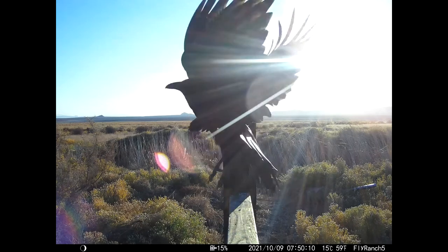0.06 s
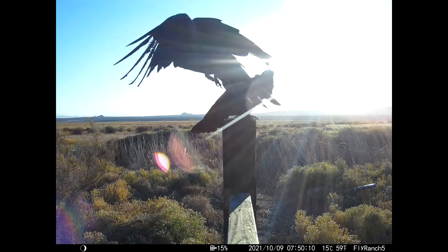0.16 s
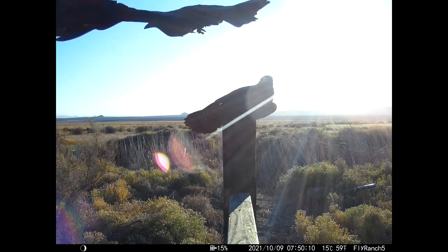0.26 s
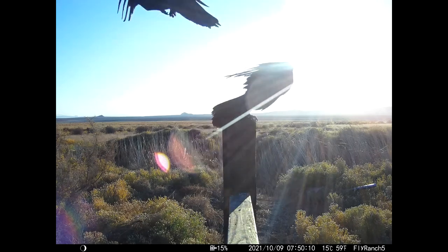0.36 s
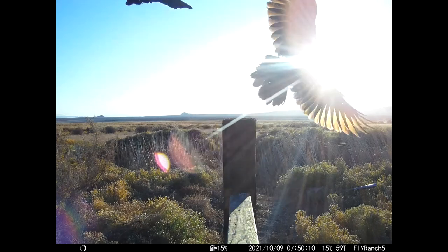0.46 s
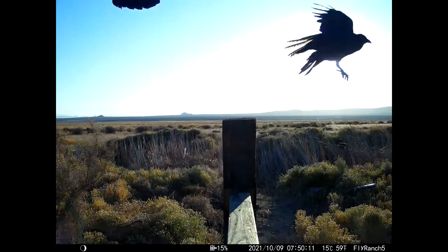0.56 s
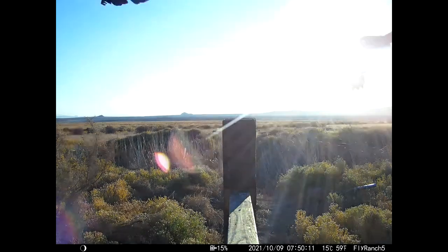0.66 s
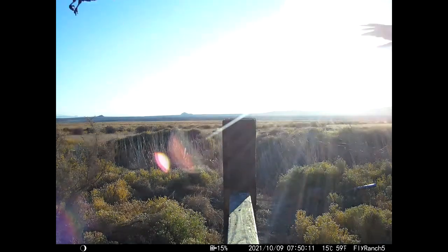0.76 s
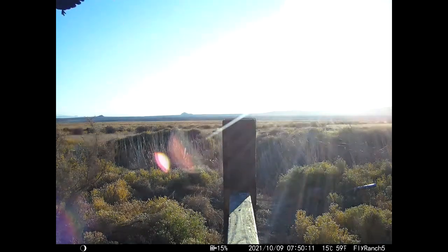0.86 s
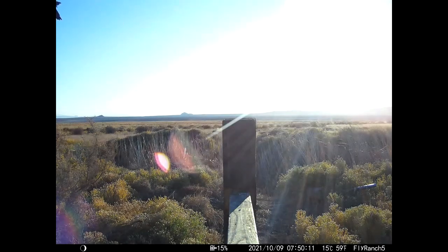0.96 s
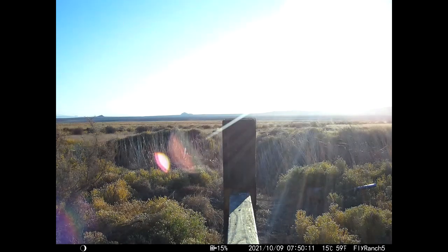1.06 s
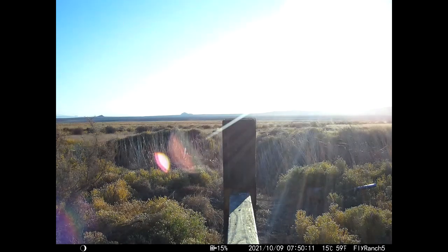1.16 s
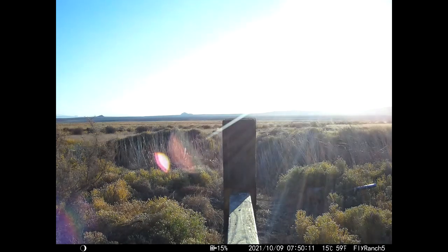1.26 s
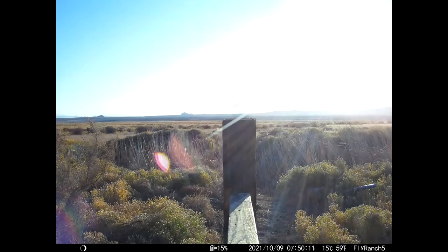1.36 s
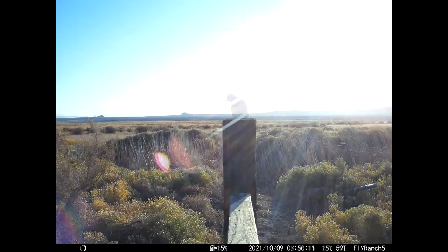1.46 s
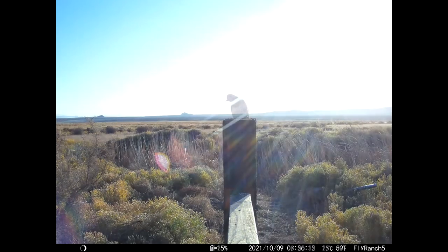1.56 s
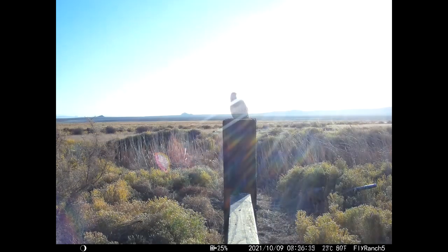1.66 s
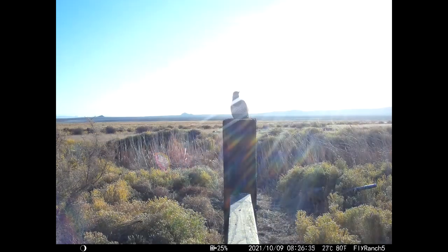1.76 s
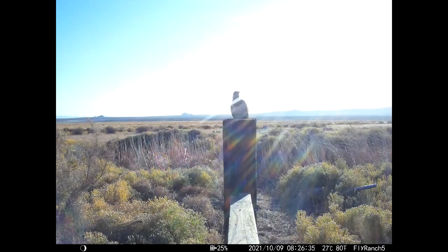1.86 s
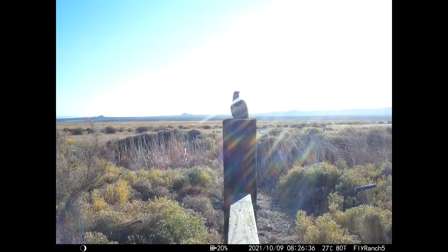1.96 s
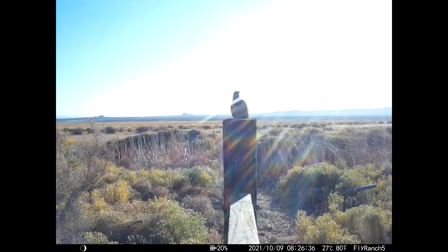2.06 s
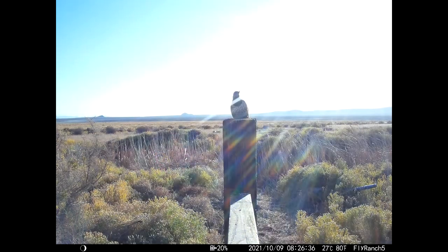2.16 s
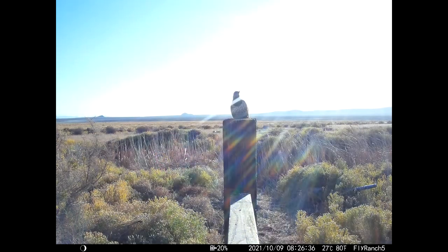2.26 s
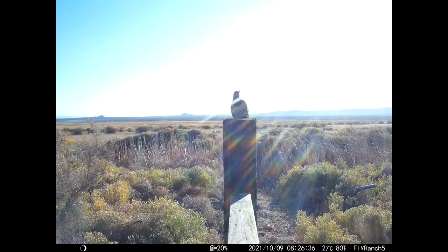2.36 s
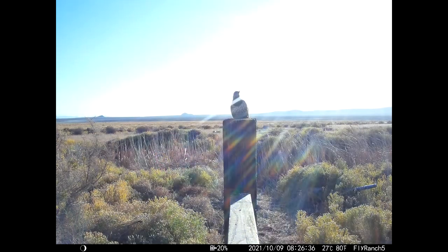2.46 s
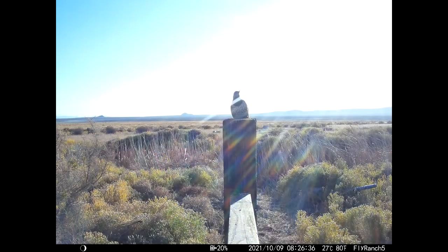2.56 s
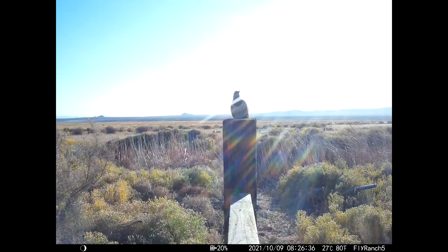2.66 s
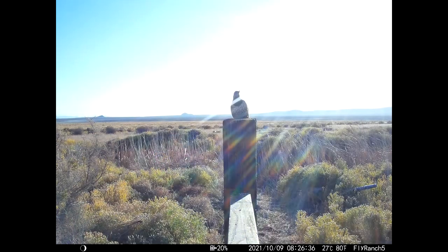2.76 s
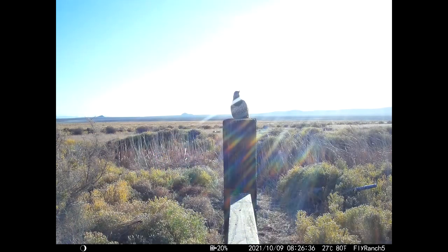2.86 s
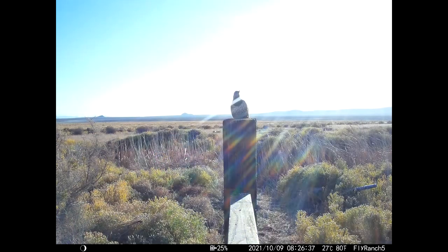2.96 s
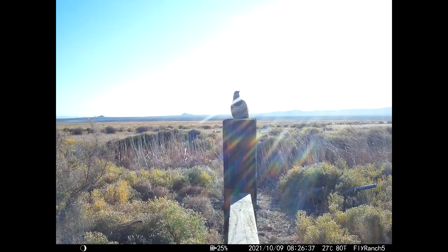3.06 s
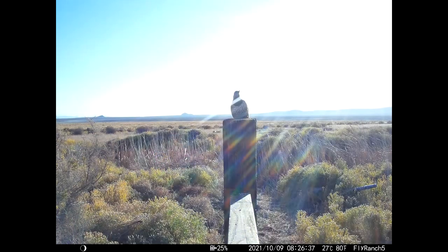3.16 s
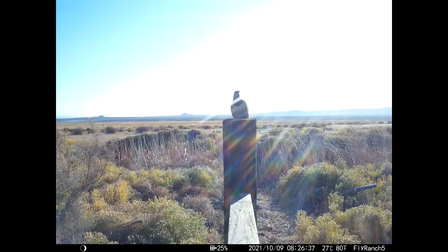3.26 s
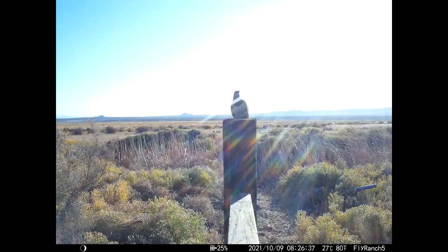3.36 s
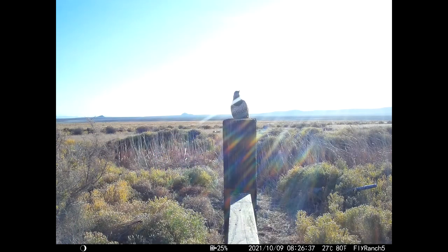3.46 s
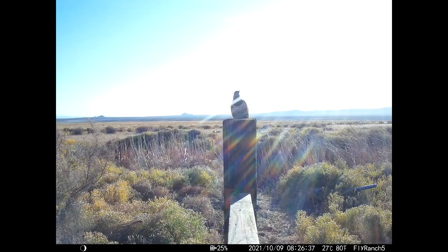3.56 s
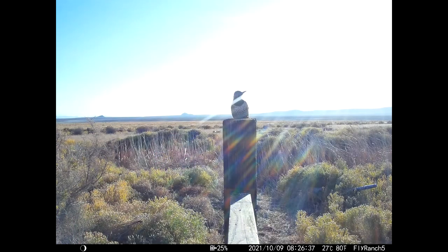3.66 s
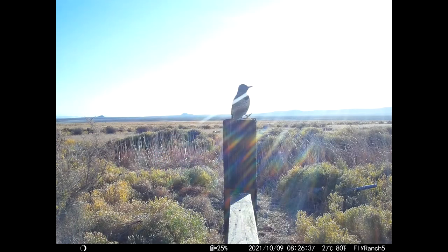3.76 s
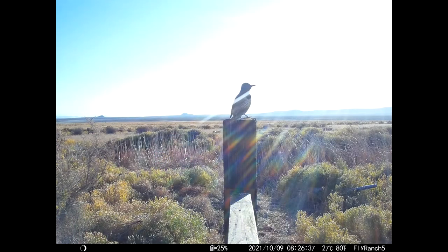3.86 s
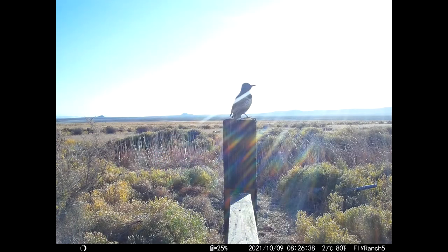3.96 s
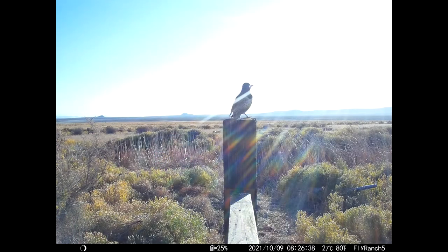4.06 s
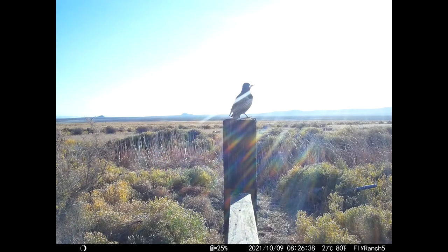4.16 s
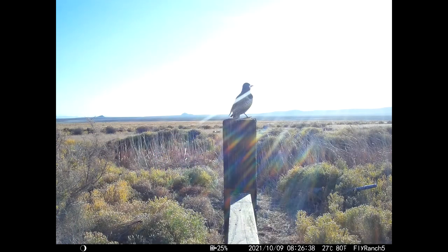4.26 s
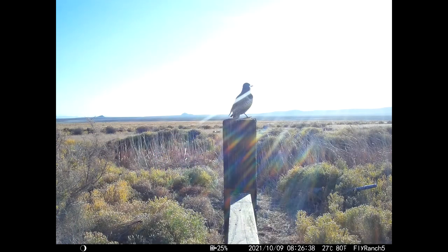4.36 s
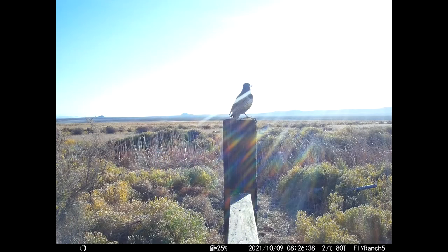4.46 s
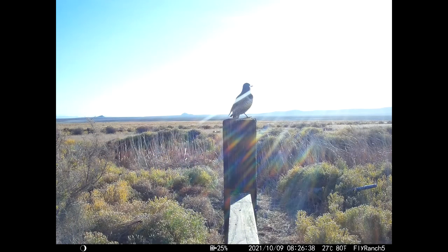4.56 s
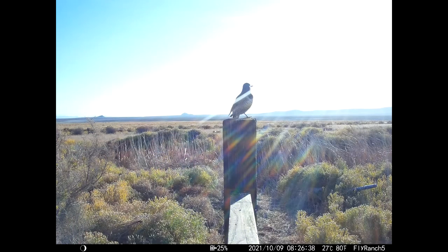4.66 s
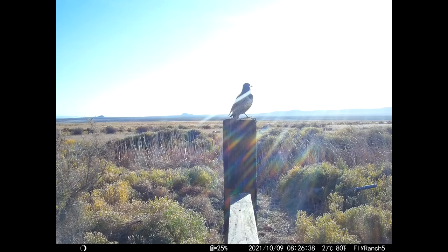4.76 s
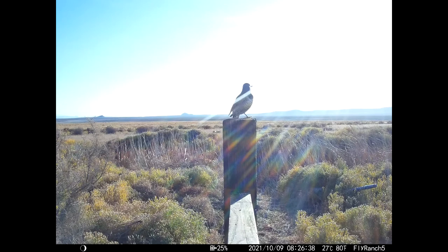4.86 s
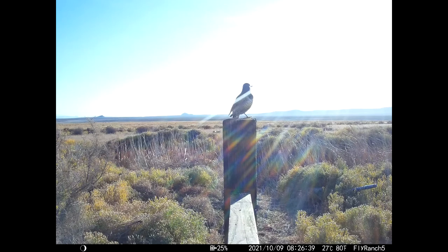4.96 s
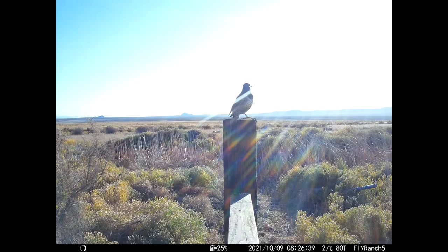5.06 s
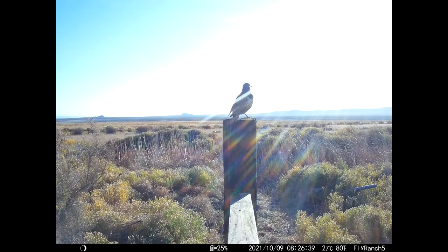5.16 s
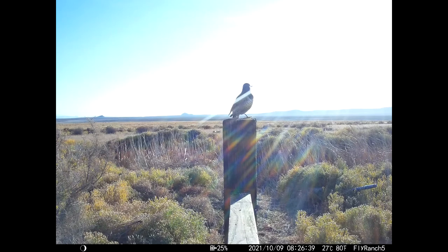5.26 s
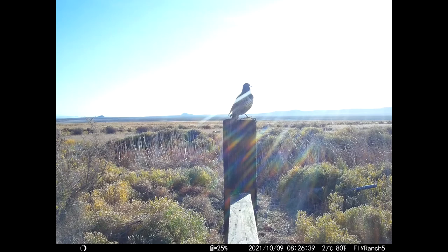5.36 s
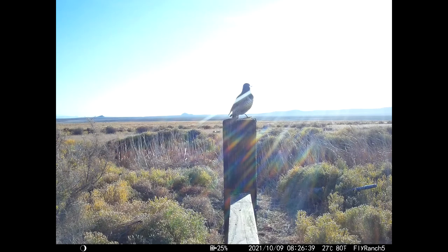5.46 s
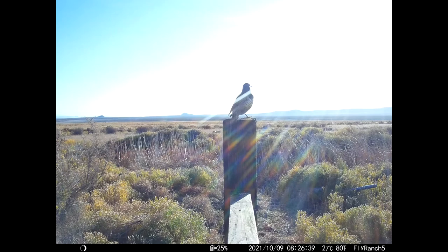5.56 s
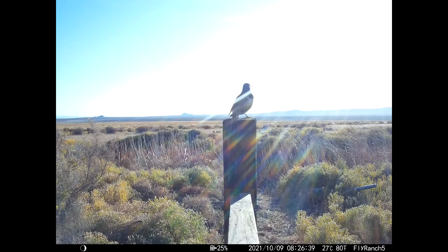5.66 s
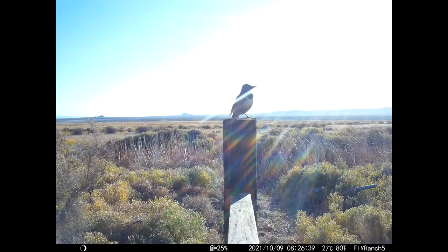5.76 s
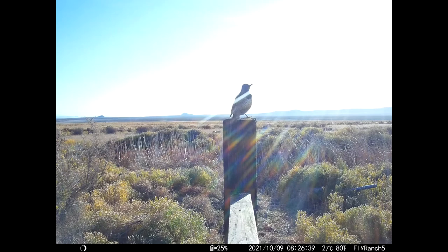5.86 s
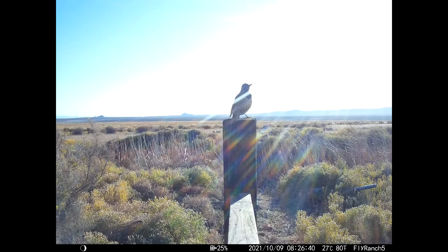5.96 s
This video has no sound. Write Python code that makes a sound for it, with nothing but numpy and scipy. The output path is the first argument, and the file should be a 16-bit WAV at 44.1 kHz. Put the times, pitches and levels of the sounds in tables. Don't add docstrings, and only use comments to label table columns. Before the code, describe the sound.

Outdoors on a quiet open plain, a microphone sits close to a post. At once a large bird leaps away: a very loud, hard quill clap at about 0.07 seconds, then dense feathery flutter, hissing wing tips and low booms of scooped air, with a second bird's strokes overlapping until 0.4. Beats come about five a second, weakening strongly after 0.7 and nearly gone by 1.8. From 1.25 to 1.75 the wake strikes the microphone in low, lumpy thumps and buffeting. Then only faint air and hiss remain. A tiny whistle comes near 2.1; faint, far, throaty croaks begin at about 2.5, 3.2, 3.9, 4.4 and 5.1, each lasting a quarter second. A falling whistle at 2.7 leads into a short, high rising chirp at 2.8, with a soft flick of air. Tiny feather ticks follow near 3.75, another thin descending whistle at 4.4, and barely audible pips at 5.0 and 5.7.

```python
import sys
import numpy as np
from scipy import signal
from scipy.fft import rfft, irfft, next_fast_len
from scipy.io import wavfile
from scipy.ndimage import uniform_filter1d, map_coordinates

SR = 44100
rng = np.random.default_rng(int(sys.argv[2]) if len(sys.argv) > 2 else 0)


def digitize_waveform(pressure):
    field = np.atleast_2d(pressure).T
    bounded = np.clip(field, -1, 1)
    quanta = np.round(bounded * 32767).astype(np.int16)
    wavfile.write(sys.argv[1], SR, quanta)


def undo_db(level):
    steps = np.asarray(level, float) / 20
    return 10 ** steps


N = 265614
TIME = np.arange(N) / SR
WING = round(2.1 * SR)


def unit(x):
    return x / np.sqrt(np.mean(x ** 2) + 1e-20)


def along(points, hz):
    f, v = np.transpose(points)
    return np.interp(np.log(hz + 1), np.log(f + 1), v)


def level_curve(rows):
    s, db = np.transpose(rows)
    return undo_db(np.interp(TIME[:WING], s, db))


def wobble(rate):
    return map_coordinates(rng.standard_normal(12000), [TIME * rate])


def noise(spectrum, grain_db=0, rate=900, count=N):
    m = next_fast_len(count)
    hz = np.fft.rfftfreq(m, 1 / SR)
    white = rng.standard_normal(count)
    if grain_db:
        white = white * undo_db(grain_db * wobble(rate)[:count])
    inside = (hz > spectrum[0][0]) * (hz < spectrum[-1][0])
    gain = undo_db(along(spectrum, hz)) * inside
    return unit(irfft(rfft(white, m) * gain, m)[:count])


def bump(s, rise, fall, count=N):
    t = TIME[:count] - s
    return np.exp(-.5 * (t / np.where(t < 0, rise, fall)) ** 2)


def phrase(rows):
    s, *cols = np.transpose(rows)
    a, b = round(s[0] * SR), round(s[-1] * SR)
    return slice(a, b), [np.interp(TIME[a:b], s, c) for c in cols]


# f/Hz, level/dB [per Hz]
FAR_AIR = [(12, -33), (20, -3), (95, 0.5), (275, -8.5), (430, -9.5), (560, -12), (794, -14), (1080, -16.5),
           (1350, -19), (3480, -20.5), (5140, -19.5), (13300, -25.5), (15700, -32.5)]


def far_air():
    return undo_db(-61 + .7 * wobble(3)) * noise(FAR_AIR)


# downstroke t/s, upstroke t/s, flutter level/dB of downstroke, turn, upstroke
BEATS = [(0.165, 0.286, -39.5, -48, -31), (0.367, .484, -34, -34, -32), (0.558, .69, -37, -40.5, -39.5),
         (0.763, .9, -46, -52.5, -45.5), (0.982, 1.117, -56, -57, -53), (1.21, 1.316, -62, -74, -57),
         (1.431, 1.544, -59.5, -63, -57.5), (1.646, 1.758, -67, -76, -63), (1.874, 1.98, -78.5, -81.5, -82)]
# delay t/s, rise t/s, fall t/s, flutter level/dB, tip hiss level/dB [over flutter]
PARTS = [
    (0.00088, 0.0056, 0.025, -0.2, -2),
    (0.055, .011, 0.012, 0, 0),
    (.001, 0.036, 0.0073, -0.4, -4),
    (0.023, 0.0097, 0.043, -18.5, 2.5),
]


def beat_strokes():
    turning_db_per_s = 7
    rows = []
    for down, up, down_db, turn_db, up_db in BEATS:
        times, levels = (down, down, up, up), (down_db, turn_db, up_db, up_db)
        for i, (delay, rise, fall, db, tip_db) in enumerate(PARTS):
            s, vane_db = times[i], levels[i] + db
            hiss_db = levels[i] + db + tip_db
            if i == 0:
                hiss_db += turning_db_per_s * s
            rows.append((s + delay, rise, fall, vane_db, hiss_db))
    return rows


def patches(x, depth_db):
    z = signal.stft(x, nperseg=256)[2]
    field = uniform_filter1d(rng.standard_normal(z.shape), size=3, axis=0)
    field = uniform_filter1d(field, size=3, axis=1)
    return unit(signal.istft(z * undo_db(depth_db * unit(field)), nperseg=256)[1][:len(x)])


# t/s, rise t/s, fall t/s, vane
# level/dB, tip level/dB
FLURRY = [(.045, 0.022, 0.022, -39, -40.5), (0.085, 0.0093, .027, -38.5, -32.5),
          (.185, 0.0033, 0.0073, -33, -34), (.202, 0.011, 0.011, -42, -32.5),
          (0.242, 0.017, 0.011, -31.5, -34), (.281, 0.0065, 0.023, -37.5, -41),
          (.376, .006, 0.0057, -36, -34), (.399, 0.0067, 0.0099, -50, -32.5), (1.37, 0.017, .02, -67, -63)]
# t/s, level/dB
RUSH = [(0.0, -47.5), (.04, -36.5), (.12, -38), (.2, -39.5), (.55, -37.5), (.7, -45.5), (.93, -54.5),
        (1.6, -58), (2.0, -73.5)]
# f/Hz, level/dB [per Hz]
VANE = [(120, -31.5), (220, -7.5), (500, 2.5), (900, -7), (1300, -10.5), (1600, -1.5), (2300, -1),
        (3000, -4), (3800, -10.5), (5000, -9.5), (7000, -15.5), (9000, -39)]
# f/Hz, level/dB [per Hz]
TIP = [(900, -31.5), (2000, -9), (3700, -4.5), (4800, -4), (5600, -2.5), (6900, -0.5), (7800, -5),
       (9000, -12), (10600, -20.5), (13200, -23), (15700, -32.5)]


def feathers():
    rush = level_curve(RUSH) * undo_db(-6) * (TIME[:WING] < RUSH[-1][0])
    vane_power, tip_power = (0.49 * rush) ** 2, rush ** 2
    for s, rise, fall, vane_db, tip_db in FLURRY + beat_strokes():
        swell = bump(s, rise, fall, count=WING) ** 2
        vane_power = vane_power + swell * undo_db(2 * vane_db)
        tip_power = tip_power + swell * undo_db(2 * tip_db)
    flutter = patches(noise(VANE, grain_db=0.5, rate=450, count=WING), depth_db=2.5)
    hiss = patches(noise(TIP, grain_db=1.0, rate=1900, count=WING), depth_db=2.5)
    return np.sqrt(vane_power) * flutter + np.sqrt(tip_power) * hiss


# t/s, level/dB
GUST = [(0.0, -55), (1.0, -65), (1.2, -76), (1.31, -51.5), (1.37, -44.5), (1.51, -40.5), (1.58, -35),
        (1.76, -54), (2.0, -73)]
# f/Hz, level/dB [per Hz]
BUFFET = [(30, -14), (50, -4), (90, 3.5), (160, -4), (300, -17.5), (500, -25.5), (1000, -37.5),
          (2500, -52.5)]
# t/s, pressure [full scale], width t/s
EDDIES = [(.035, 0.004, .011), (.06, -.01, 0.015), (.125, .0043, .024), (1.245, -0.0018, .012),
          (1.272, 0.0064, .015), (1.4, 0.011, .011), (1.462, -0.013, .012), (1.625, -.0073, .015),
          (1.362, -0.017, 0.0056), (1.384, -0.045, 0.0025), (1.408, -0.026, .0022), (1.433, 0.015, 0.0032),
          (1.488, .0086, 0.0026), (1.526, 0.018, 0.0059), (1.576, 0.027, .0019), (1.588, 0.028, .0013),
          (1.61, 0.03, .003), (1.696, 0.02, 0.0019), (1.662, 0.0032, 0.0032), (1.684, 0.01, 0.0026),
          (1.72, 0.01, 0.0035), (1.745, 0.0068, 0.0095)]
# delay t/s, pressure [full scale], width t/s
PUSH_DOWN = [(.025, .0055, .011), (.053, -0.0049, 0.015)]
# delay t/s, pressure [full scale], width t/s
PUSH_UP = [(-.002, -.0034, 0.011), (.027, 0.0059, 0.014)]


def wake():
    puff_db, puff_s = -49.5, 0.019
    t = TIME[:WING]

    def near(s):
        return np.exp(-(s / 0.92) ** 8)

    gust = level_curve(GUST)
    puffs = np.zeros(WING)
    for s in [.04] + [row[0] for row in BEATS]:
        puffs += near(s) * bump(s + .025, puff_s, puff_s, count=WING)
    on = np.clip((GUST[-1][0] - t) / .1, 0, 1)
    slow = noise([(8, -21.5), (18, 1), (32, 1.5), (45, -17), (70, -43)], count=WING)
    swing = undo_db(-7.0) * (undo_db(-8) * gust + undo_db(puff_db + 0.5) * puffs + undo_db(-60)) * slow
    lumps = noise(BUFFET, grain_db=3.0, rate=40, count=WING)
    buffet = undo_db(-4.5) * (gust + undo_db(puff_db) * puffs) * lumps
    pushes = []
    for row in BEATS:
        for s, shape in zip(row, (PUSH_DOWN, PUSH_UP)):
            pushes += [(s + delay, p * near(s), width) for delay, p, width in shape]
    eddies = np.zeros(WING)
    for s, p, width in EDDIES + pushes:
        dip = 1 - 0.94 * ((t - s) / width) ** 2
        eddies += p * dip * bump(s, width, width, count=WING)
    return on * (swing + buffet) + eddies


# delay t/s, length t/s, f/Hz, level/dB [over flutter], clearness [0-1]
CUPS = [
    (.001, 0.01, 255, 3, 0.76),
    (.066, 0.014, 428, -2.5, 0.75),
    (-.013, 0.016, 505, -1, .4),
]


def beat_scoops():
    rows = []
    for down, up, down_db, turn_db, up_db in BEATS[:-1]:
        late = 1 + 0.3 * down ** 2
        times = (down, down, up)
        levels = (down_db, turn_db, min(up_db, -42.5))
        for cup, s, level, shift in zip(CUPS, times, levels, (late, 1, 1)):
            delay, length, hz, db, clear = cup
            clear = clear * np.exp(-(s / 0.73) ** 2)
            rows.append((s + delay, length * shift, hz * shift, level + db, clear))
    return rows


# t/s, length t/s, f/Hz,
# level/dB, clearness [0-1]
SCOOPS = [(.045, 0.025, 450, -44, 0), (.073, 0.011, 333, -36, 0.86), (.086, 0.0057, 528, -27, 0.2),
          (.168, .008, 260, -33.5, 0.7), (.203, 0.016, 354, -41, 0.2), (.235, .0092, 516, -36, 1),
          (0.365, 0.0059, 262, -33, 0.76), (0.438, 0.0099, 414, -37.5, 0.72), (.624, 0.01, 530, -45, 0.85),
          (1.582, .017, 306, -51.5, 0.7), (.06, 0.023, 202, -50.5, 0), (.73, .02, 165, -55.5, 0),
          (.85, 0.03, 507, -52.5, 0.34), (.92, 0.019, 174, -53, .1), (1.07, 0.039, 508, -60, 0.37),
          (1.315, 0.011, 500, -53.5, 0.36)]


def scoops():
    pocket = 9700
    out = np.zeros(WING)
    for s, length, hz, db, clear in SCOOPS + beat_scoops():
        clear = np.clip(clear, 0, 1)
        start = max(round(s * SR) - pocket // 2, 0)
        t = TIME[start:start + pocket] - s
        tone = np.sqrt(2) * np.cos(2 * np.pi * hz * t)
        around = [(hz * 0.26, -30), (hz * 0.64, -6), (hz, 0), (hz * 1.17, -6), (hz * 2.76, -14), (hz * 5, -34)]
        blur = noise(around, count=pocket)
        swell = np.exp(-.5 * (t / np.where(t < 0, length, length * 0.91)) ** 2)
        mix = np.sqrt(clear) * tone + np.sqrt(1 - clear) * blur
        out[start:start + pocket] += undo_db(db) * swell * mix
    return out


# t/s, peak level/dB
SNAPS = [(0.074, 5), (0.0747, -11), (.1906, -20), (0.195, -18), (.312, -21), (0.3737, -16), (.5538, -20),
         (.7678, -35)]
# f/Hz, level/dB, 60 dB decay t/s
QUILL = [(608, -15, .014), (1760, -13, 0.0058), (2560, 0.5, 0.0046), (3550, -5, 0.0056),
         (4570, -0.5, 0.0055), (6450, -3.5, 0.007), (7000, 2.5, 0.00566)]


def snaps():
    out, t = np.zeros(WING), TIME[:2200]
    for s, db in SNAPS:
        ring = np.zeros(len(t))
        for hz, level, t60 in QUILL:
            ring += undo_db(level + rng.normal(0, 1.5) - 60 * t / t60) * np.sin(2 * np.pi * hz * t)
        out[round(s * SR):][:len(t)] += undo_db(db - 7.0) * ring * (1 - np.exp(-t / 0.00014))
    after = np.maximum(TIME[:WING] - SNAPS[0][0], 0)
    spray = undo_db(-10.5 - 60 * after / 0.015) * (1 - np.exp(-after / 0.00027))
    out += spray * (noise(TIP, count=WING) + 0.63 * noise(VANE, count=WING))
    out = out / (1 + np.abs(out / .8) ** 6) ** (1 / 6)
    band = signal.butter(4, [110, 9400], "bandpass", fs=SR, output="sos")
    return signal.sosfilt(band, signal.sosfilt(band, out))


# t/s, length t/s, level/dB
FLICK = [(2.81, 0.031, -58.5), (1.4, 0.014, -58), (1.746, 0.046, -62.5), (0.975, 0.047, -59),
         (1.21, 0.059, -63.5)]


def flicks():
    body = noise([(80, -18), (180, 4), (400, 2), (630, -2), (900, -9), (1500, -11.5)])
    return body * sum(undo_db(db) * bump(s, length, length * 1.5) for s, length, db in FLICK)


# t/s, f/Hz, level/dB
CHIRP = [(2.753, 5600, -64), (2.764, 6020, -51), (2.781, 6510, -46), (2.797, 6530, -43), (2.808, 6600, -42),
         (2.822, 6860, -46.5), (2.833, 6800, -57), (2.85, 6800, -64)]
# offset f/Hz, level/dB, build-up t/s
BURR = [(776, -10, .02), (-620, -21, 0.017)]
# start t/s, length t/s, first f/Hz, last f/Hz, peak level/dB
GLIDES = [(2.68, .068, 5750, 4430, -57.5), (2.742, .012, 4450, 4000, -65), (4.388, .036, 5680, 5150, -64),
          (4.418, .064, 5210, 4350, -64.5), (2.085, .023, 5000, 5340, -62), (5.0, .03, 1555, 1545, -67),
          (5.69, .03, 1540, 1600, -65), (2.756, .034, 10050, 9900, -64), (2.776, .036, 9400, 9560, -65),
          (2.8, .038, 9520, 9050, -66)]
# share of length [0-1], level/dB
SWELL = [(0, -10), (.2, -8.5), (.45, -1.7), (.8, -4.5), (1, -13)]


def notes():
    tones = [CHIRP]
    for off_hz, off_db, build in BURR:
        side = []
        for s, hz, db in CHIRP:
            onset_db = -9 * np.exp(-(s - CHIRP[0][0]) / build)
            side.append((s, hz + off_hz, db + off_db + onset_db + 6 * (s > 2.83)))
        tones.append(side)
    for s, length, first_hz, last_hz, db in GLIDES:
        tones.append([(s + u * length, first_hz + u * (last_hz - first_hz), db + swell_db)
                      for u, swell_db in SWELL])
    return tones


def whistles():
    out, shake, waver = np.zeros(N), wobble(450), wobble(300)
    for rows in notes():
        span, (hz, db) = phrase(rows)
        fade = signal.windows.tukey(len(hz), .1)
        turn = 2 * np.pi * np.cumsum(hz * (1 + 0.0099 * waver[span])) / SR
        out[span] += np.sqrt(2) * fade * undo_db(db + 1.7 * shake[span]) * np.sin(turn)
    t = TIME[:9700]
    tail = rng.standard_normal(len(t)) * undo_db(-60 * t / 0.13)
    return out + undo_db(-9.5) * signal.fftconvolve(out, tail / np.linalg.norm(tail))[:N]


# start t/s, length t/s, top f/Hz, level/dB, upper overtones level/dB
CROAKS = [(2.51, 0.26, 578, -63.5, -9), (3.18, 0.28, 573, -64.5, -3.5), (3.87, 0.29, 584, -62.5, -0.5),
          (4.409, .27, 559, -63, -1.5), (5.1, 0.29, 586, -62, -0.5)]
# share of length [0-1], pitch [of top], level/dB, flutter f/Hz, depth [of pitch]
CROAK = [(0, .88, -10.5, 69.4, .14), (.29, .935, -3.5, 62.47, 0.17), (.54, 0.99, 1.3, 52, 0.046),
         (.76, 0.99, 0.5, 48, 0.052), (.9, .9, -3, 46, .055), (1, .89, -11, 45.5, 0.056)]
# f/Hz, level/dB
THROAT = [(500, -28), (850, -4), (1150, -6.5), (1400, -3.5), (1700, -10.5), (1900, -26), (2400, -36)]
# f/Hz, level/dB [per Hz]
RASP = [(700, -25.5), (900, 1.5), (1150, 9.5), (1400, 2.5), (1700, -17), (2000, -20.5)]


def croaks():
    out, jitter, breath = np.zeros(N), wobble(100), noise(RASP)
    for s, length, top_hz, top_db, beak_db in CROAKS:
        rows = [(s + u * length, top_hz * share, top_db + rel_db, *flutter)
                for u, share, rel_db, *flutter in CROAK]
        span, (hz, db, flutter_hz, depth) = phrase(rows)
        beat = 2 * np.pi * np.cumsum(flutter_hz) / SR
        pitch = hz * (1 + .9 * depth * np.sin(beat) + .009 * jitter[span])
        turn = 2 * np.pi * np.cumsum(pitch) / SR
        tone = np.zeros(len(hz))
        for k in (1, 2, 3, 4):
            tone += np.sqrt(2) * undo_db(along(THROAT, k * pitch) + beak_db * (k > 2)) * np.sin(k * turn)
        rasp = (.2 + 4.2 * depth) * breath[span]
        out[span] += undo_db(db + 2.3) * (1 + 0.15 * np.cos(beat + 0.6)) * (tone + rasp)
    return out


# t/s, level/dB
RUSTLE = [(3.71, -66.5), (3.752, -65), (3.771, -61.5), (3.788, -68.5)]


def head_ticks():
    band = noise([(4500, -30), (5400, -1), (6200, -8.5), (7200, 0), (8000, -31.5)])
    return band * sum(undo_db(db) * bump(s, .003, 0.0037) for s, db in RUSTLE)


def scene():
    takeoff = np.pad(feathers() + wake() + scoops() + snaps(), (0, N - WING))
    later = flicks() + whistles() + croaks() + head_ticks()
    return (far_air() + takeoff + later)[None]


def low_pass(x):
    return signal.sosfilt(signal.butter(12, 15830, fs=SR, output="sos"), x)


# t/s, lowest f/Hz, share lost [0-1]
GAPS = [(1.22, 1000, .6), (1.45, 1000, .5), (2.37, 900, .6), (2.745, 5000, .3), (2.775, 800, .65),
        (2.84, 1500, .6), (3.015, 1000, .38), (3.028, 1000, .42), (3.095, 1100, .5), (3.71, 2000, .5),
        (4.235, 600, .8), (4.418, 1500, .6), (4.82, 800, .5), (5.525, 1700, .55), (5.72, 1500, .45),
        (5.905, 1500, .45)]


def record(dry):
    frame, hop_overlap = 512, 384
    soft = dry / (1 + np.abs(dry / 1.0) ** 16) ** (1 / 16)
    hz, t, z = signal.stft(soft, SR, nperseg=frame, noverlap=hop_overlap)
    weak = np.abs(z) < undo_db(-70)
    for s, low_hz, share in GAPS:
        chance = np.repeat(rng.random(frame), 2)[:len(hz)]
        lost = (chance < share - .03 + .15 * (hz > 9000)) & (hz > low_hz)
        moment = np.exp(-((t - s) / .013) ** 4)
        z = z * (1 - .97 * weak * lost[:, None] * moment)
    z = z * (hz < 15800)[:, None]
    mix = signal.istft(z, SR, nperseg=frame, noverlap=hop_overlap)[1][:, :N]
    return low_pass(mix)


dry = scene()
out = record(dry)
digitize_waveform(out)
```